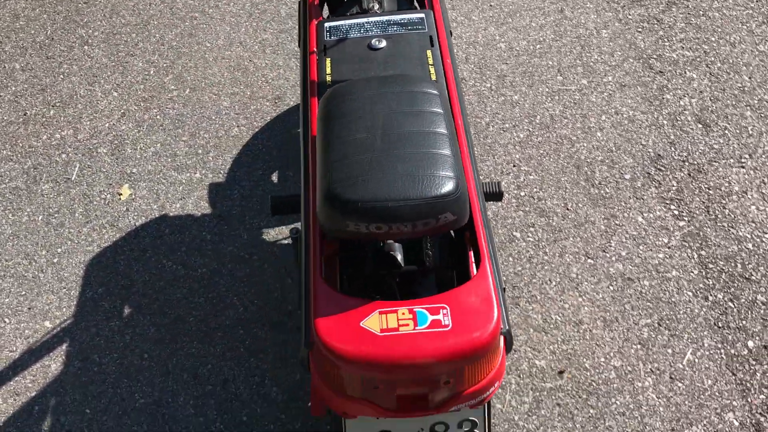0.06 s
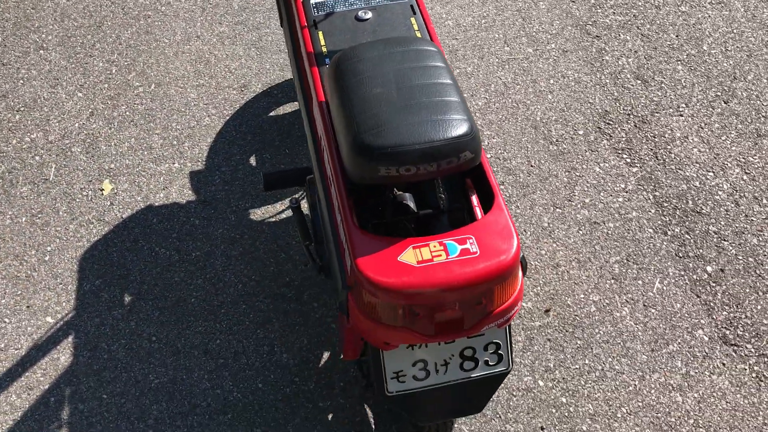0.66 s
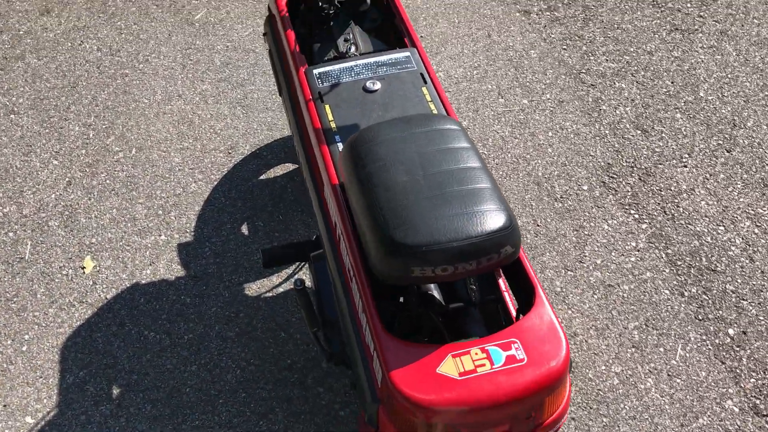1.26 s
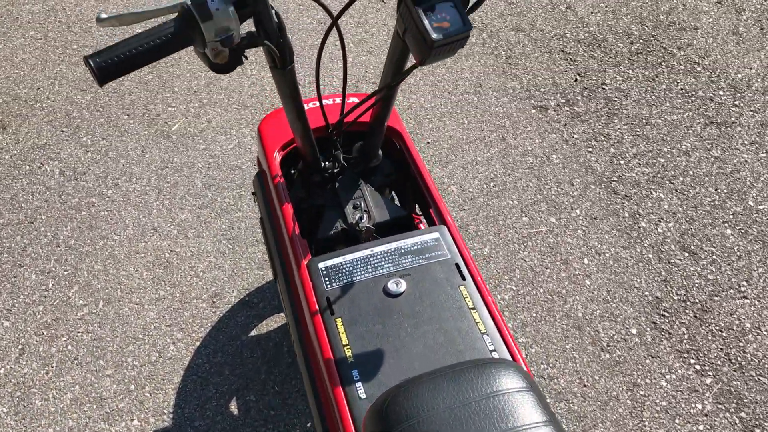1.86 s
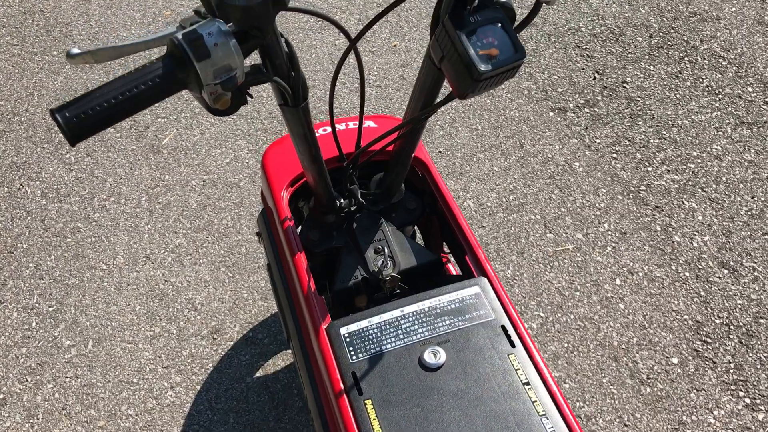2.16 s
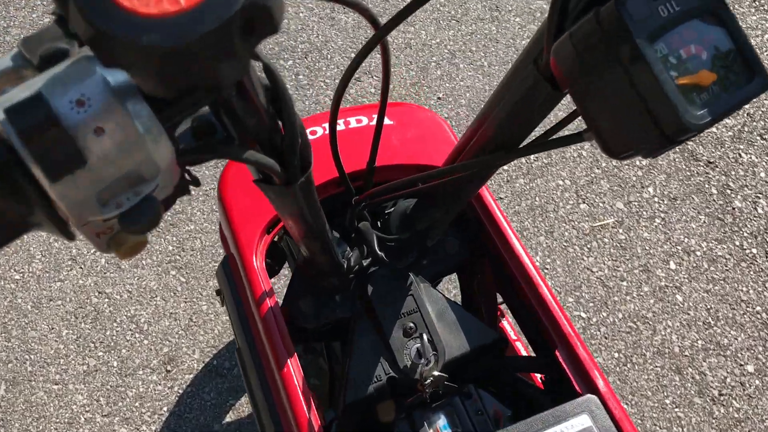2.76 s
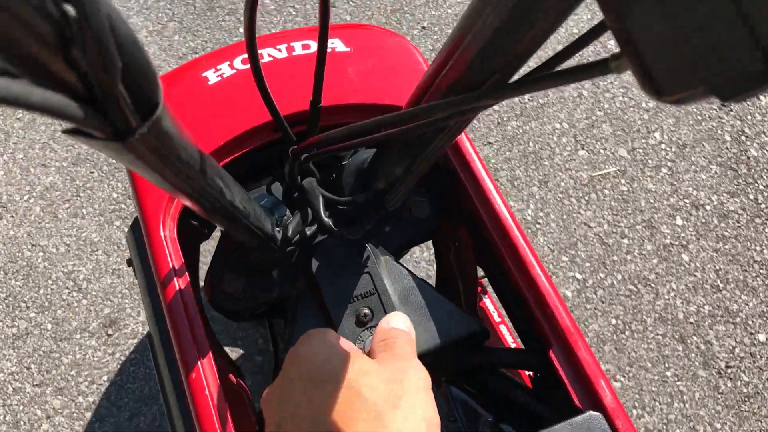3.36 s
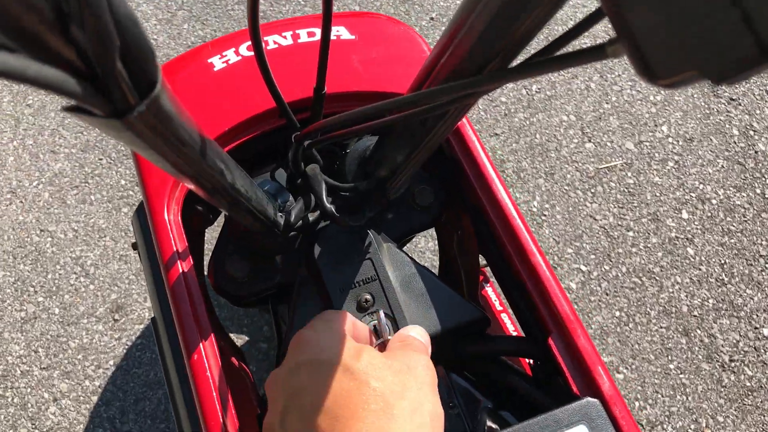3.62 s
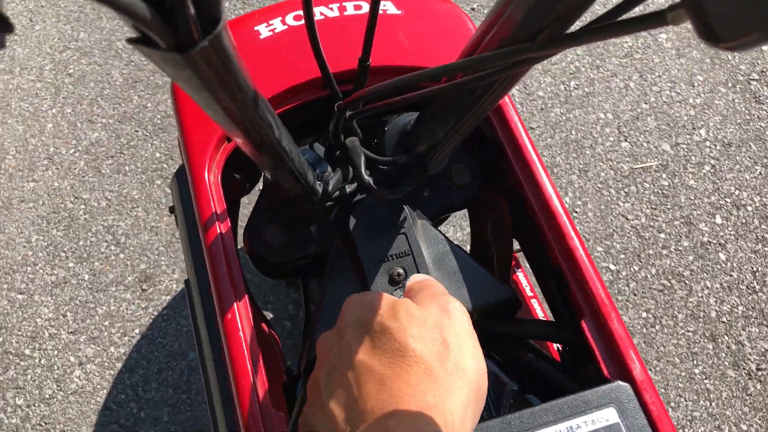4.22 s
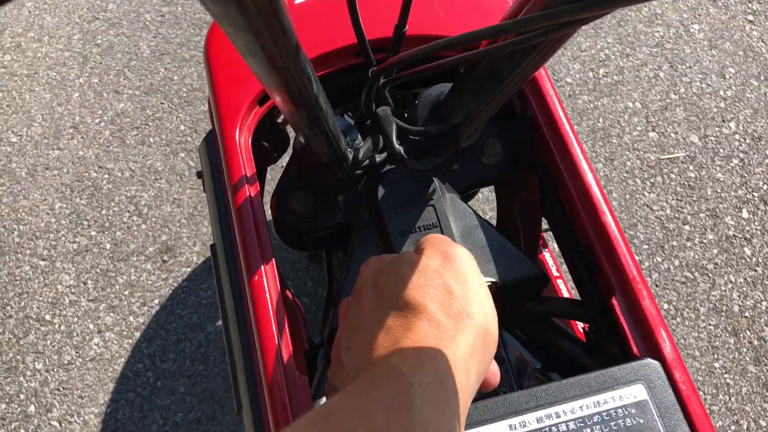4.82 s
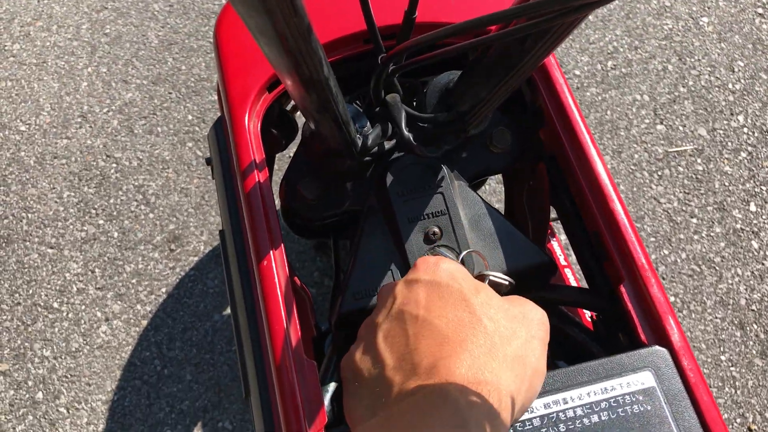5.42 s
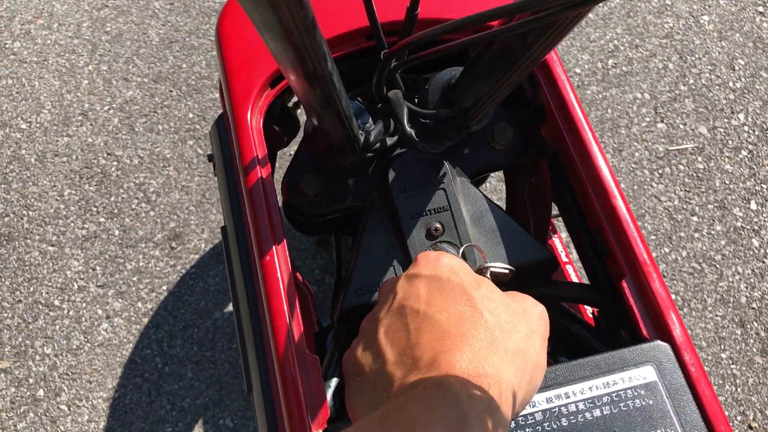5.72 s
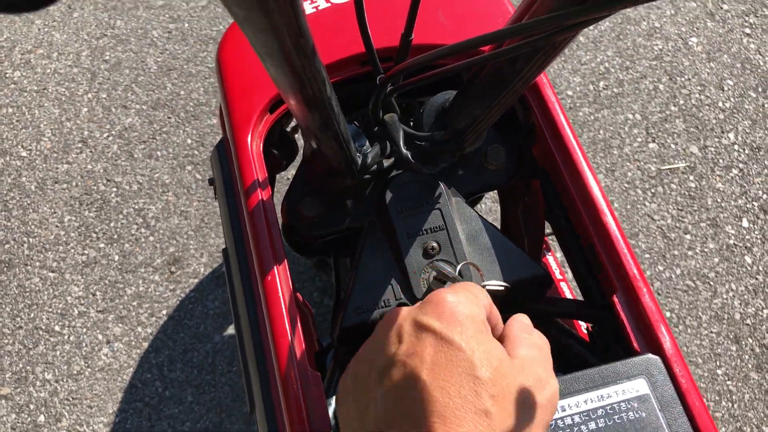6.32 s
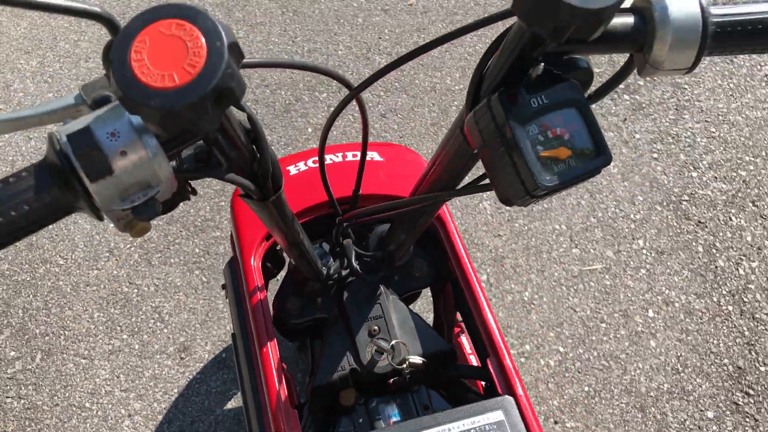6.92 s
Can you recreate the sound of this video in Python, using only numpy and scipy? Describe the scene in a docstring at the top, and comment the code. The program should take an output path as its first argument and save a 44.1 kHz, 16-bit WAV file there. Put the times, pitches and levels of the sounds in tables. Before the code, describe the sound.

A small two-stroke scooter idles outdoors, a steady putter with metallic rattling and irregular ringing exhaust pops. The microphone moves from the tail to the handlebars, where keys jingle lightly and the lock ticks. The key turns and the engine runs down in under a second. The ignition lock clicks and clunks close by, then a faint rustle leaves only open air and far traffic hum.

```python
"""Open asphalt, the microphone at the tail of an idling two-stroke scooter. Every turn of the crank puffs
through the silencer and rattles the finned cylinder; every third to sixth fires with a ringing pop.
The microphone walks past the seat to the handlebars, where the keys jingle from about 3 s.
At 4.7 s the key is turned and the engine coasts to rest; the ignition lock clicks and clunks close by.
A faint rustle follows, leaving open air, thin whistles and the hum of far traffic."""
import sys
import numpy as np
from scipy import signal
from scipy.fft import rfft, irfft, next_fast_len
from scipy.io import wavfile

SR = 44100
rng = np.random.default_rng(int(sys.argv[2]) if len(sys.argv) > 2 else 0)


def inscribe(sig):
    """Save sig as 16-bit PCM at rate SR to the path in sys.argv[1].

    A 1-D sig is mono; a 2-D sig holds one channel per row.
    Samples are clipped to [-1, 1] before scaling.
    """
    pcm = np.round(np.clip(np.atleast_2d(sig).T, -1, 1) * 32767)
    wavfile.write(sys.argv[1], SR, pcm.astype(np.int16))


N = 316619
T = np.arange(N) / SR

# firings of the cylinder: (time [s], pop strength [dB])
FIRINGS = [(0.0682, -24), (0.2527, -24.5), (0.3725, -20.5), (0.4924, -33), (0.5857, -23), (0.7045, -19),
           (0.828, -22.5), (0.9507, -19.5), (1.071, -18.5), (1.193, -18.5), (1.3127, -36.5),
           (1.4076, -20.5), (1.5316, -18), (1.6835, -21.5), (1.8078, -21.5), (1.927, -15.5),
           (2.0495, -17.5), (2.1682, -24.5), (2.2608, -19), (2.4107, -19.5), (2.5315, -14), (2.678, -16.5),
           (2.798, -13), (2.9462, -29.5), (3.04, -17), (3.2201, -19.5), (3.3462, -19.5), (3.496, -19.5),
           (3.6154, -27.5), (3.7075, -19.5), (3.8591, -20.5), (3.9793, -24.5), (4.0713, -18.5),
           (4.1955, -18), (4.3177, -17), (4.4408, -19), (4.5652, -19), (4.6874, -19.5)]
# resonances of the scooter's parts: (frequency [Hz], width [Hz], gain [dB])
SILENCER_MODES = [(54.4, 8.7, -10.5), (76.4, 42, -3), (154.9, 8.6, 5), (226, 260, 2)]
AIR_BOX_MODES = [(173.6, 35.7, 6), (192, 15, -11.5), (368, 43, -4)]
PIPE_WALL_MODES = [(1450, 90, -2), (1650, 90, 0), (1770, 80, -1), (2240, 150, -10), (2750, 250, -11),
                   (3210, 80, -5), (3500, 90, -5), (3980, 80, -11)]
FIN_MODES = [(2040, 45, -11), (2170, 60, -9), (2390, 45, -11), (3975, 32, -2), (4252, 26, 2),
             (4350, 120, -7), (4474, 45, -3), (4760, 28, -8), (5056, 36, -6), (5400, 55, -7),
             (6143, 40, -8), (6473, 32, -9), (6808, 70, -5), (7150, 100, -10), (7550, 80, -11),
             (7946, 80, -10), (8700, 80, -13), (9380, 70, -13)]
PANEL_MODES = [(351, 117, -4), (572.4, 11, 0.5)]
COWL_MODES = [(750, 150, 2.5), (877, 61, -3), (1870, 200, 0), (2060, 300, -5)]
FRAME_MODES = [(171, 59, -1), (358, 31, 3.5), (413, 47, 6.5), (656, 50, 5), (715, 32, 2), (810, 26, -2),
               (890, 35, -11), (1230, 99, -20), (1570, 67, -23)]
KEY_MODES = [(2600, 700, -14), (8550, 50, -11), (10750, 50, -12), (11860, 32, -1), (13270, 36, 2),
             (14000, 2500, -22)]
# colours of the noises, near to far: (frequency [Hz], level [dB])
CRACK_SPECTRUM = [(200, 0), (450, 5), (620, 17), (900, 9.5), (1150, 9), (2500, 3.5), (3600, -.5),
                  (5000, -54), (15000, -49)]
SPIT_SPECTRUM = [(1500, -4), (3400, 9.5), (4500, -5), (8000, -5.5), (15000, -11)]
CLATTER_SPECTRUM = [(220, 9.5), (330, 4), (430, 6.5), (510, -2.5), (640, 9.5), (760, -7), (860, 3.5),
                    (1030, -14), (1340, 4.5), (1520, 4.5), (1750, 7.5), (2200, -6), (3000, -1),
                    (5000, -25.5)]
RATTLE_SPECTRUM = [(1500, -30), (3000, -9), (4300, 1), (5200, 8), (5750, 2), (7300, 3.5), (8500, -5),
                   (10300, -5.5), (13000, -3.5), (16000, -7)]
LOCK_SPECTRUM = [(120, -29), (200, 1.5), (334, -9.5), (416, -13.5), (722, -5.5), (791, -9), (1000, -10.5),
                 (1270, -6.5), (1740, -4), (2860, -8), (3430, -14), (4120, -10), (6050, -18.5),
                 (8580, -23.5), (16000, -51)]
TICK_SPECTRUM = [(470, -26), (800, -15), (3100, -33), (3830, 5), (5050, -10.5), (6330, 4), (7170, -10),
                 (8990, 4), (10700, -12), (13900, -1), (16000, -8)]
RUSTLE_SPECTRUM = [(200, -5), (500, -11), (3000, 7), (8500, 0), (11000, -3), (15000, -4)]
AIR_SPECTRUM = [(25, -24), (45, -9), (130, -3), (250, -8.5), (300, -17.5), (400, -16.5), (575, -23.5),
                (1150, -19.5), (1600, -23), (2700, -26.5), (4900, -39.5), (10400, -45.5), (14800, -32),
                (16000, -46)]
HUM_SPECTRUM = [(30, -8), (60, 13), (250, -7), (600, -32)]
# piston and bearing noise over one turn; the piston slaps twice: (angle [turns], level [dB])
SLIDING = [(.05, -10), (.22, -9.5), (.31, -.5), (.43, 6.5), (.62, 5), (.8, -5), (.95, -8.5)]
KNOCKING = [(.05, -18.5), (.22, -12.5), (.36, -2), (.65, -8.5), (.85, -1)]
SLAPPING = [(.02, -7.5), (.2, -14.5), (.45, -5), (.72, -1), (.88, -19)]
# the microphone's walk from tail to handlebars: (time [s], level [dB])
MIC_CLOSENESS = [(0, -43.5), (1.0, -44.5), (2.4, -42.5), (3.3, -40.5), (4.0, -41), (4.8, -40)]
TAILPIPE_BEAM = [(1.2, 3.5), (2.0, 0.5)]   # treble is beamed backwards and fades off axis
SEAT_SHADE = [(1.3, 1), (2.25, -3), (2.7, -4), (3.15, -1)]   # the seat screens the middle treble
PANEL_BOOM = [(1.45, -70), (1.95, -47.5), (2.4, -46), (3.2, -48.5), (4.6, -47.5), (5.0, -56)]   # strongest beside the side panel
# the key in the lock barrel: (time [s], snap level [dB], tick level [dB])
LOCK_CLICKS = [(3.239, -44, -78), (3.549, -48, -56), (3.84, -46, -78), (3.888, -42, -78),
               (4.741, -41.5, -60), (6.318, -53.5, -48.5)]
# the engine stops, the lock is turned home: (time [s], snap level [dB], frame knock level [dB])
CLUNKS = [(5.431, -50, -56), (5.488, -35, -42.5), (5.602, -40, -48.5), (5.735, -66, -65),
          (5.760, -49, -54.5), (6.334, -78, -55), (6.352, -59, -49), (6.364, -43.5, -39.5),
          (6.397, -74, -47.5)]
# the hand touches the keys: (time [s], level [dB])
KEY_JINGLES = [(3.153, -56), (3.263, -55), (3.285, -49), (3.445, -55), (3.537, -54), (3.55, -49),
               (3.577, -51), (4.740, -45)]
# bands of far traffic hum: (frequency [Hz], width [Hz], gain [dB])
HUM_BANDS = [(68, 13, -7.5), (85, 17, -17), (123, 22, -2.5), (193, 38, -3), (235.5, 10, -4)]
# swell of that hum: (time [s], level [dB])
HUM_LEVEL = [(6.6, -57), (6.85, -49), (7.18, -52)]
# far whistles: (start [s], end [s], frequency [Hz], width [Hz], level [dB])
WHISTLES = [(5.76, 6.08, 6620, 130, -74), (6.64, 7.06, 6330, 70, -65.5), (6.96, 7.04, 2374, 40, -64),
            (7.07, 7.2, 2390, 40, -64), (6.85, 7.3, 1120, 20, -72)]

FIRING_TIMES = np.array(FIRINGS)[:, 0]
IDLE_TURN_S, IDLE_TURNS_PER_S = .0303, 30.153
BRAKING_TURNS_PER_S2, ZERO_SPEED_S, REST_S = 33.506, 5.6918, 5.46   # the crank stops short of zero speed
PIPE_RING_HZ, USUAL_POP_DB, PUFF_LEAD_S = 1322.6, -17.5, .005


def engine():
    """The main source: puffs, pops and rattling metal, all locked to the crank."""
    angle = crank_angle()
    return breathing(angle) + cylinder_rattle(angle) + pipe_ringing(angle) + firing_pops()


def crank_speed(s):
    """Turns per second: steady at idle; with the spark off, friction brakes the crank evenly."""
    return np.minimum(IDLE_TURNS_PER_S, BRAKING_TURNS_PER_S2 * (ZERO_SPEED_S - np.minimum(s, REST_S)))


def crank_angle():
    """Angle in turns: whole turns between firings, then the run-down."""
    turns = np.r_[0, np.cumsum(np.round(np.diff(FIRING_TIMES) / IDLE_TURN_S))]
    idle = np.interp(T, np.r_[FIRING_TIMES[0] - 4 * IDLE_TURN_S, FIRING_TIMES], np.r_[-4, turns])
    return idle + np.cumsum(crank_speed(T) * (T > FIRING_TIMES[-1])) / SR


def turn_times(angle):
    """Times at which the running crank completes a turn."""
    return T[1:][(np.diff(np.floor(angle)) > 0) & (T[1:] < REST_S)]


def gain_at_mic(idle_db, closeness_share, db_per_halving):
    """An engine layer follows the microphone's distance and each halving of the crank's speed."""
    close_db, = in_time(MIC_CLOSENESS)
    closer_db = close_db - close_db[T < REST_S].mean()
    halvings = np.log2(IDLE_TURNS_PER_S / crank_speed(T))
    return from_db(idle_db + closeness_share * closer_db + db_per_halving * halvings)


def puff(width_s, lag_s):
    """A smooth gulp of gas, peaking lag_s after the port opens."""
    t = np.arange(SR // 40) / SR - PUFF_LEAD_S
    return np.exp(-((t - lag_s) / width_s) ** 2 / 2)


def breathing(angle):
    """The port puffs into the silencer once a turn; a quarter turn later the intake rings the air box."""
    outflow, inflow = np.zeros(N), np.zeros(N)
    for s in turn_times(angle):
        if np.min(abs(FIRING_TIMES - s)) < IDLE_TURN_S / 2:   # a burnt charge leaves earlier and harder
            gas = from_db(5) * puff(.001, lag_s=.0012)
        else:   # a slow crank holds the port open longer
            gas = puff(.0012 * np.sqrt(IDLE_TURNS_PER_S / crank_speed(s)), lag_s=.0037)
        add(outflow, s - PUFF_LEAD_S, gas * from_db(1.13 * rng.standard_normal()))
    for s in turn_times(angle - .26):
        add(inflow, s - PUFF_LEAD_S, puff(.001, lag_s=.004))
    suction = from_db(-4 * np.maximum(18 - crank_speed(T), 0))   # fades below 18 turns a second
    # the higher silencer modes swing against the two lowest
    silencer = resonate(outflow, SILENCER_MODES[:2]) - resonate(outflow, SILENCER_MODES[2:])
    air_box = resonate(inflow * suction, AIR_BOX_MODES)
    return gain_at_mic(-32.5, .28, 2.4) * rms_one(silencer + air_box)


def firing_pops(blast_s=.0063):
    """Each firing blasts the pipe: its main ring, the wall modes, a crack and a spit from the outlet."""
    out, t = np.zeros(N), np.arange(SR // 10) / SR
    wall_lowpass = signal.butter(4, 4030, fs=SR, output="sos")   # the wall radiates little above this
    for s, db in FIRINGS:
        excess_db = db - USUAL_POP_DB
        beam_db = np.interp(s, *np.transpose(TAILPIPE_BEAM))
        shade_db = np.interp(s, *np.transpose(SEAT_SHADE))
        gas = rng.standard_normal(len(t)) * np.exp(-t / blast_s)
        blast = .6 * gas / np.linalg.norm(gas) + (t == 0)
        # a stronger, hotter firing rings higher; from behind, the ring is higher and broader
        hz = PIPE_RING_HZ + 4.5 * excess_db + 5 * beam_db
        widening = from_db(1.2 * beam_db)
        ring = resonate(blast, [(hz, 75 * widening, 0)])
        ring = resonate(ring, [(hz, 330 * widening, 0)])
        wall = signal.sosfilt(wall_lowpass, resonate(blast + .1 * gas, PIPE_WALL_MODES))
        crack = colour(gas, CRACK_SPECTRUM)
        spit = colour(gas * np.minimum(t / .00072, 1), SPIT_SPECTRUM)
        treble = at_level(wall, -42 + .16 * beam_db) + at_level(crack, -45.5)
        treble += at_level(spit, -57.5 + 2.9 * beam_db)
        treble *= from_db(.35 * excess_db + beam_db + shade_db)
        add(out, s, at_level(ring, db - 15.5 - 1.33 * beam_db) + treble)
    return out


def stroke(angle, shape):
    """Envelope over each turn: as the crank slows, a stroke fills less of the turn; at rest it dies."""
    turn, db = np.transpose(shape)
    slowness = np.sqrt(IDLE_TURNS_PER_S / crank_speed(T))
    progress = ((angle - .3) % 1) ** (1 / slowness)   # a stroke starts .3 into the turn
    level_db = np.interp(.3 + progress, turn, db, period=1) * np.sqrt(slowness)
    return rms_one(from_db(level_db)) * slowness * np.interp(T, [5.43, REST_S], [1, 0])


def cylinder_rattle(angle):
    """Piston and bearings rub and knock, shaking the cooling fins, side panel and front cowl."""
    sliding, knocking = stroke(angle, SLIDING), stroke(angle, KNOCKING)
    rubbing, ticking, tapping = grains(3) * sliding, grains(3.5) * sliding, grains(4) * knocking
    shade_db, = in_time(SEAT_SHADE)
    boom_db, = in_time(PANEL_BOOM)
    clatter = gain_at_mic(-42, .2, -5) * at_level(colour(tapping, CLATTER_SPECTRUM), shade_db)
    rattle = gain_at_mic(-46.5, .22, -9) * rms_one(colour(rubbing, RATTLE_SPECTRUM))
    panel = at_level(resonate(tapping, PANEL_MODES), boom_db)
    # fins and cowl come up most as the microphone closes in
    fins = gain_at_mic(-42.5, 1.5, -7) * rms_one(resonate(ticking, FIN_MODES))
    cowl = gain_at_mic(-54.5, 1.8, -4) * rms_one(resonate(grains(3) * knocking, COWL_MODES))
    return clatter + rattle + panel + fins + cowl


def pipe_ringing(angle):
    """Piston slap keeps the pipe ringing between firings; its wall is heard best from behind."""
    shaking = grains(1.6) * stroke(angle, SLAPPING)
    beam_db, = in_time(TAILPIPE_BEAM)
    ring = at_level(resonate(shaking, [(PIPE_RING_HZ, 50, 0)]), -2 - 1.4 * beam_db)
    wall = at_level(resonate(shaking, PIPE_WALL_MODES), -3 + 1.1 * beam_db)
    return gain_at_mic(-48.5, .28, -1.1) * (ring + wall)


def ignition_lock(rebound_s=.0195):
    """Close up: light clicks of the barrel, and clunks that knock the frame and rebound."""
    out = np.zeros(N)
    for s, snap_db, tick_db in LOCK_CLICKS:
        add(out, s, barrel_snap(.0038, snap_db, tick_db))
    for s, first_db, knock_db in CLUNKS:
        for k in range(4):   # each rebound is weaker and more drawn out
            decay_s = .0057 * 1.1 ** k
            snap_db = first_db - 10.5 * k
            knock = at_level(resonate(contact(1.1 * decay_s), FRAME_MODES), knock_db - 6.5 * k)
            add(out, s + rebound_s * k, barrel_snap(decay_s, snap_db, snap_db - 18.5) + knock)
    return out


def barrel_snap(decay_s, snap_db, tick_db):
    """The lock barrel snaps with a bright tick; the bodywork rings on briefly."""
    body = colour(contact(decay_s) + from_db(-12) * contact(4.3 * decay_s), LOCK_SPECTRUM)
    tick = colour(contact(.95 * decay_s), TICK_SPECTRUM)
    return at_level(body, snap_db) + at_level(tick, tick_db)


def keys():
    """At the handlebars the keys tick against each other and ring."""
    out = np.zeros(N)
    for s, db in KEY_JINGLES:
        touch = contact(decay_s=.005)
        add(out, s, at_level(resonate(touch, KEY_MODES), db))
        add(out, s, at_level(colour(touch, TICK_SPECTRUM), db - 1))
    return out


def rustle(start_s=6.66, attack_s=.021, fade_db_per_s=33):
    """A faint, grainy rustle after the hand lets go."""
    since = np.maximum(T - start_s, 0)
    hiss = colour(grains(3), RUSTLE_SPECTRUM)
    return at_level(hiss, -55.5 - fade_db_per_s * since) * np.minimum(since / attack_s, 1)


def air_and_traffic():
    """The bed of the place: steady open air, and far traffic whose hum swells near the end."""
    air = colour(rng.standard_normal(N), AIR_SPECTRUM)
    hum = colour(resonate(rng.standard_normal(N), HUM_BANDS), HUM_SPECTRUM)
    hum_db, = in_time(HUM_LEVEL)
    return at_level(air, -52) + at_level(hum, hum_db)


def far_whistles():
    """Thin bands of noise swell and fade a long way off."""
    out = np.zeros(N)
    for start, end, hz, width, db in WHISTLES:
        progress = (T - start) / (end - start)
        swell = np.sqrt(np.maximum(1 - (2 * progress - 1) ** 2, 0))
        band = [(hz, width, 0)]
        out += swell * at_level(resonate(resonate(rng.standard_normal(N), band), band), db)
    return out


def contact(decay_s):
    """The force of one rough contact: a quick rise, then dying noise."""
    t = np.arange(SR // 5) / SR
    return rng.standard_normal(len(t)) * np.exp(-t / decay_s) * np.minimum(t / .00053, 1)


def grains(spread_db):
    """Dense tiny impacts of uneven strength."""
    sizes = from_db(spread_db * np.clip(rng.standard_normal(N // 24 + 1), -2, 2))
    return rng.standard_normal(N) * np.repeat(sizes, 24)[:N]


def resonate(x, modes):
    """Parallel resonances, each with its own peak gain."""
    out = 0
    for hz, width, db in modes:
        r = np.exp(-np.pi * width / SR)
        feedback = [1, -2 * r * np.cos(2 * np.pi * hz / SR), r * r]
        out = out + from_db(db) * (1 - r * r) / 2 * signal.lfilter([1, 0, -1], feedback, x + 1e-18)
    return out


def colour(x, spectrum):
    """Causal (minimum-phase) filter that follows a spectrum."""
    size = 2 * next_fast_len(len(x) // 2 + 2048, True)
    hz, db = np.transpose(spectrum)
    bin_hz = np.arange(size // 2 + 1) * SR / size
    gain = from_db(np.interp(np.log(bin_hz + 1), np.log(hz), db))
    cepstrum = irfft(np.log(gain))[:size // 2]
    cepstrum[1:] *= 2
    return irfft(rfft(x, size) * np.exp(rfft(cepstrum, size)))[:len(x)]


def from_db(db):
    """Decibels to gain."""
    return 10 ** (np.asarray(db) / 20)


def rms_one(x):
    """Scale to unit power."""
    return x / np.sqrt(np.mean(x ** 2) + 1e-20)


def at_level(x, db):
    """Scale to unit power, then apply a level or level curve."""
    return from_db(db) * rms_one(x)


def in_time(rows):
    """Each column of a curve at every sample."""
    s, *columns = np.transpose(rows)
    return [np.interp(T, s, c) for c in columns]


def add(out, s, sound):
    """Mix a short sound in at time s."""
    i = int(np.clip(round(s * SR), 0, N))
    out[i:i + len(sound)] += sound[:N - i]


def scene():
    """Mono: scooter, keys and lock near the microphone, the open air behind them."""
    return (engine() + keys() + ignition_lock() + air_and_traffic() + rustle() + far_whistles())[None]


def record(dry):
    """The microphone drops the deepest bass; the top is cut steeply."""
    low_cut = signal.butter(2, 27, "high", fs=SR, output="sos")
    high_cut = signal.ellip(12, .1, 80, 15950, fs=SR, output="sos")
    return signal.sosfilt(high_cut, signal.sosfilt(low_cut, dry))


dry = scene()
out = record(dry)
inscribe(out)
```